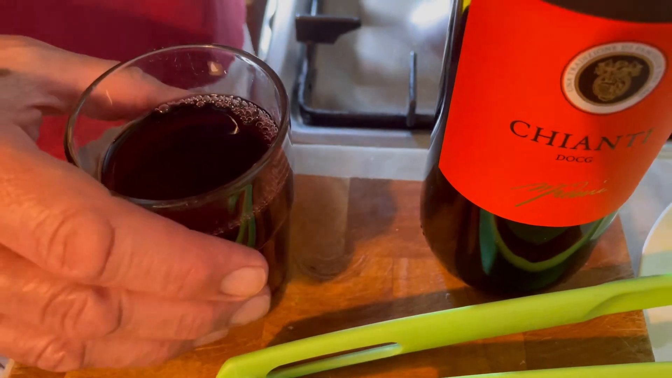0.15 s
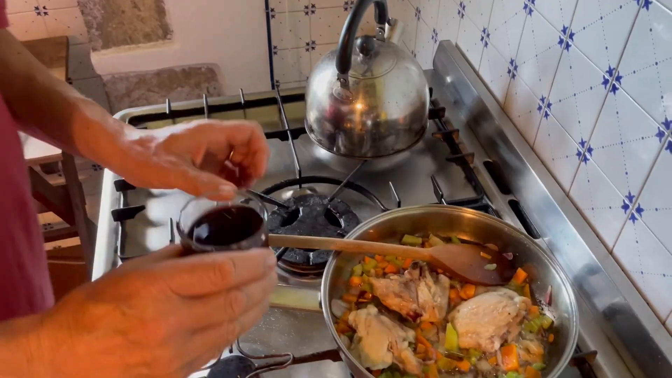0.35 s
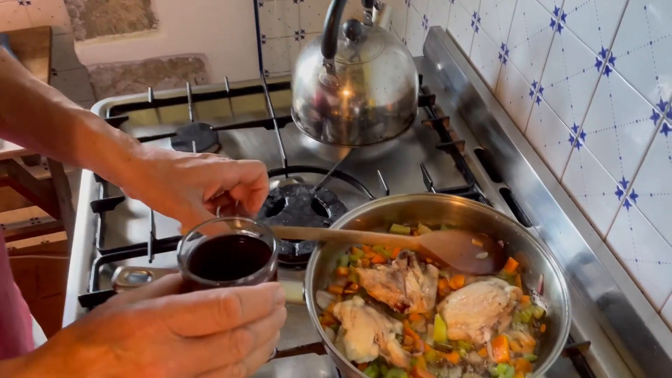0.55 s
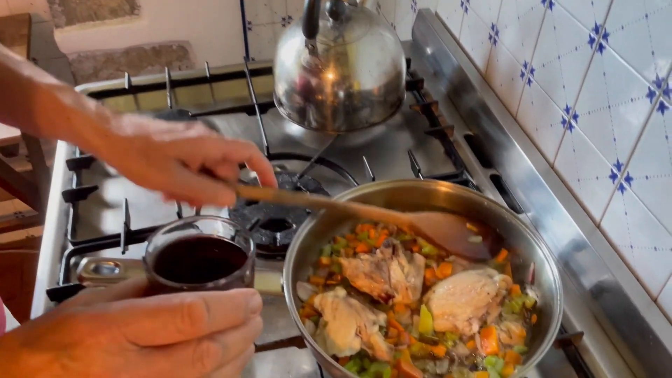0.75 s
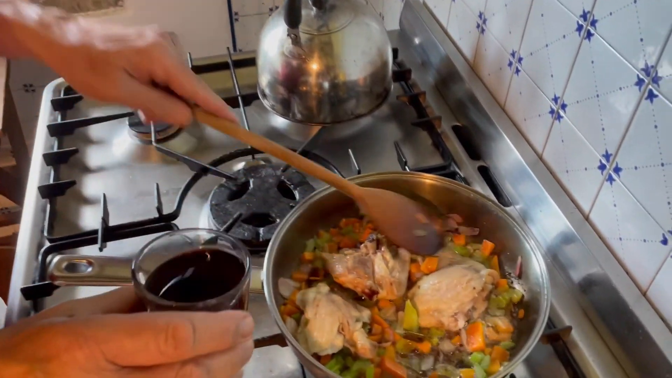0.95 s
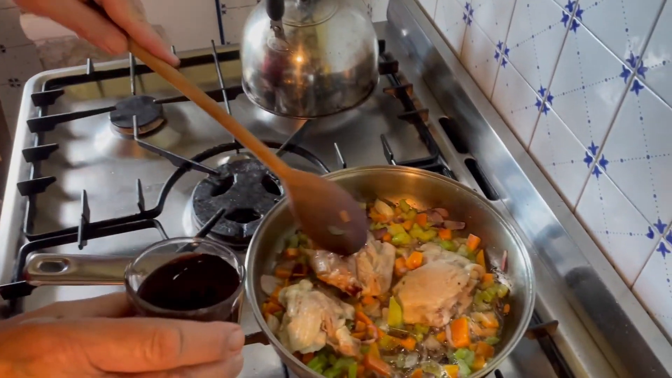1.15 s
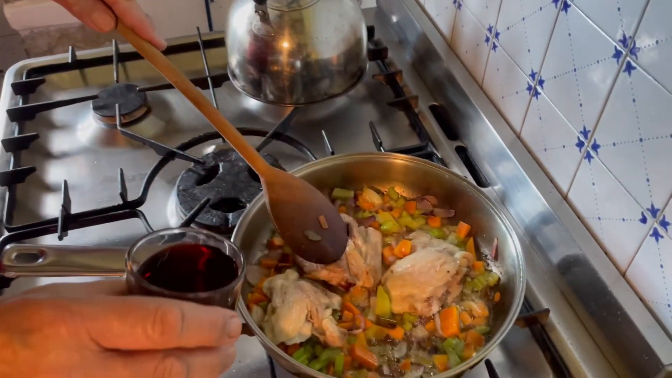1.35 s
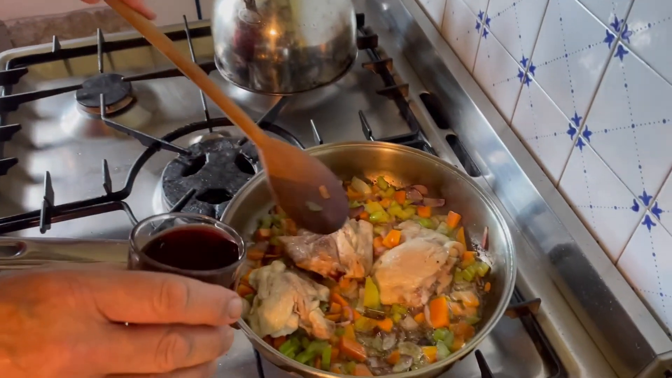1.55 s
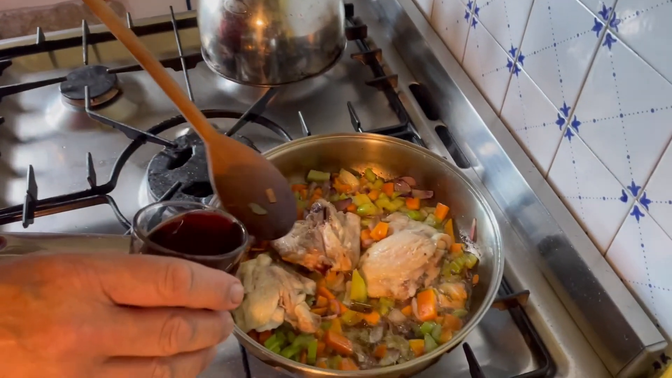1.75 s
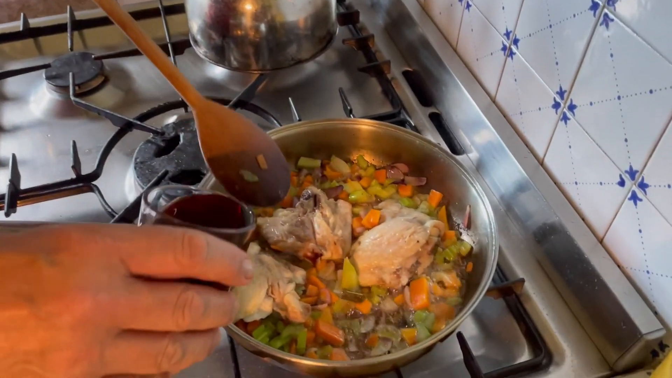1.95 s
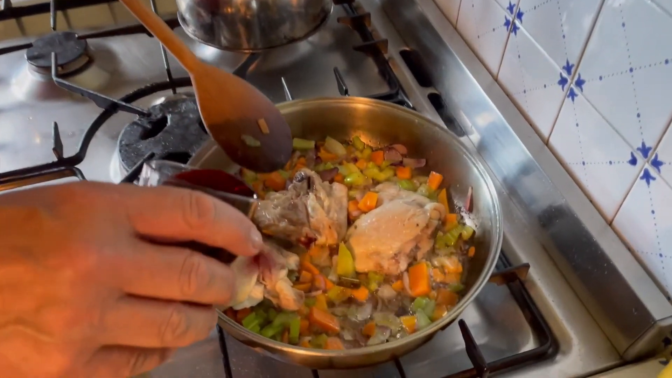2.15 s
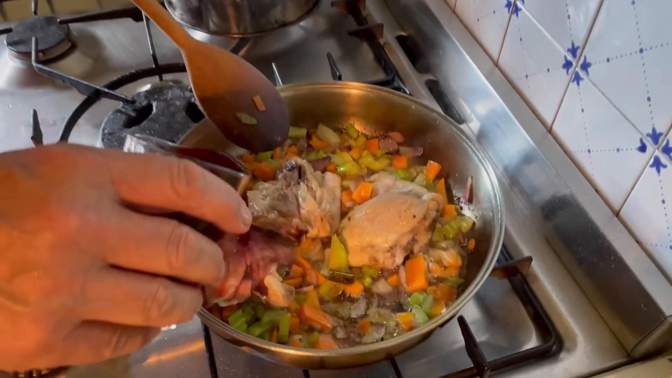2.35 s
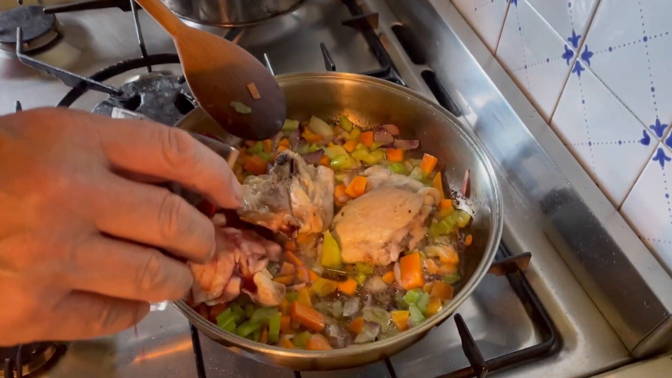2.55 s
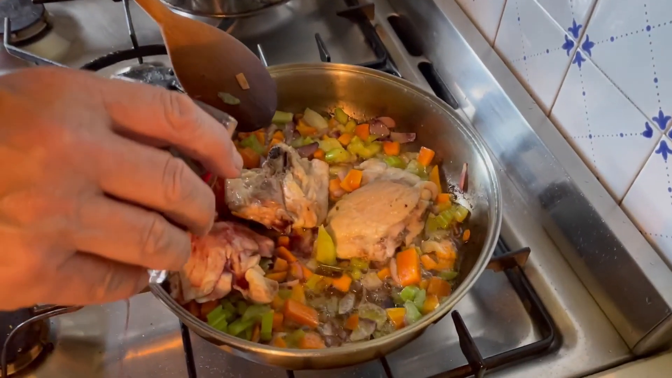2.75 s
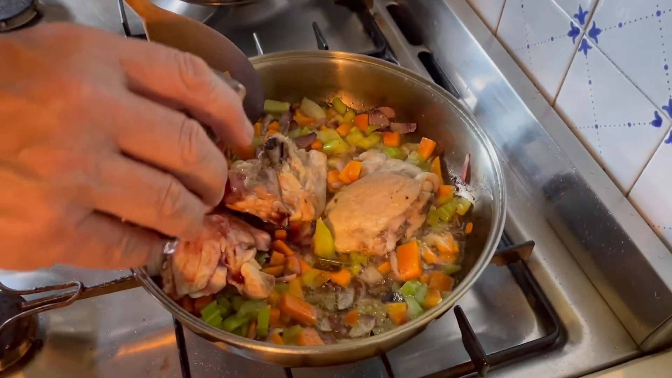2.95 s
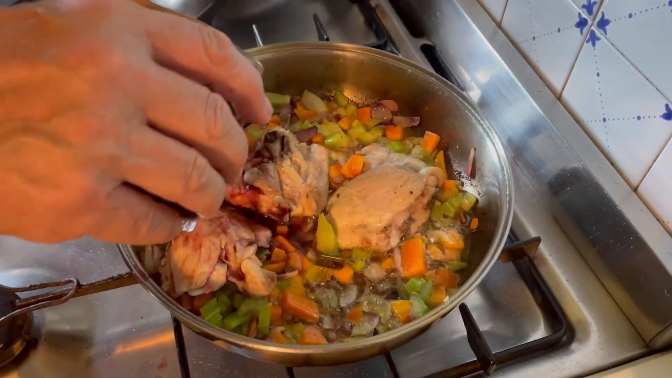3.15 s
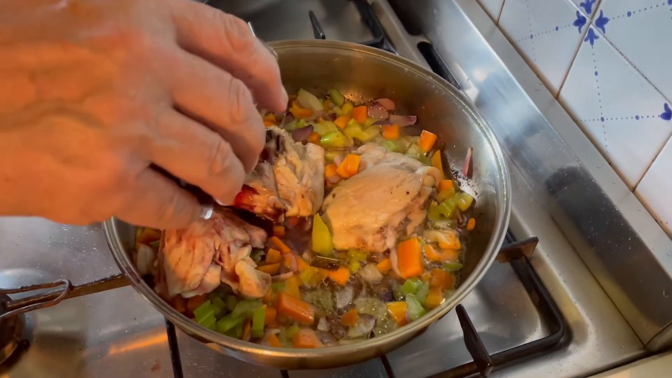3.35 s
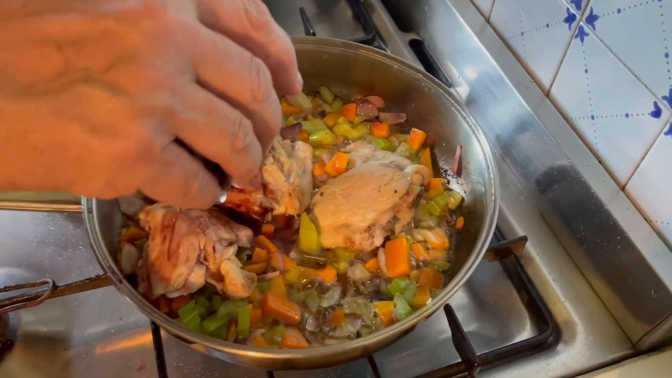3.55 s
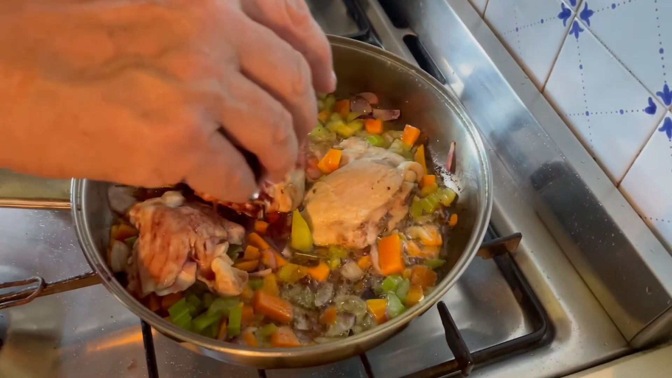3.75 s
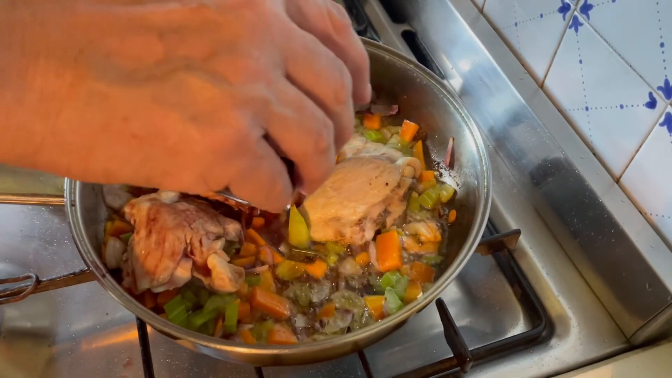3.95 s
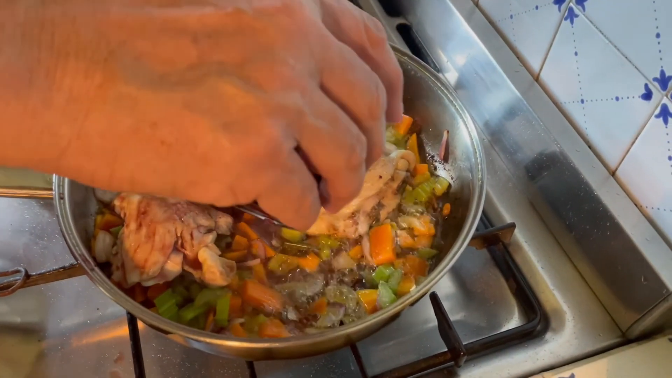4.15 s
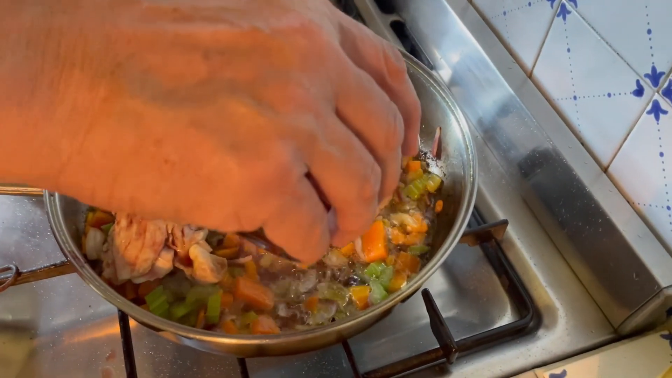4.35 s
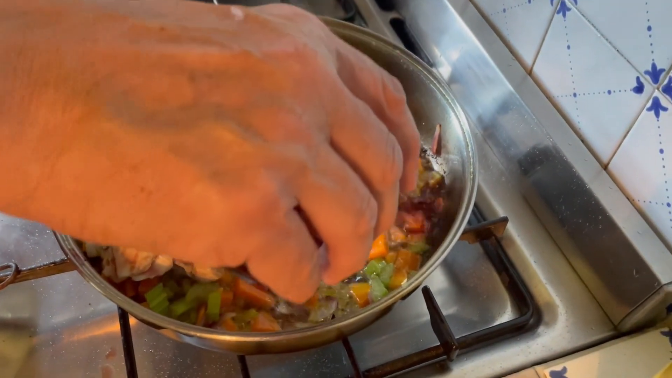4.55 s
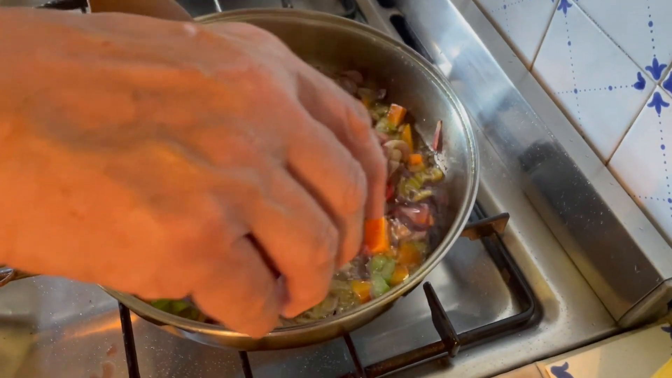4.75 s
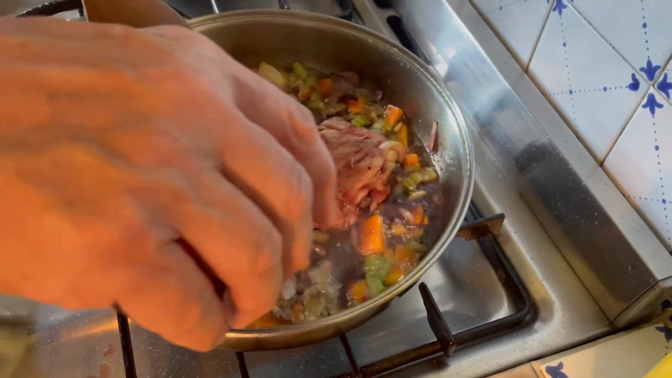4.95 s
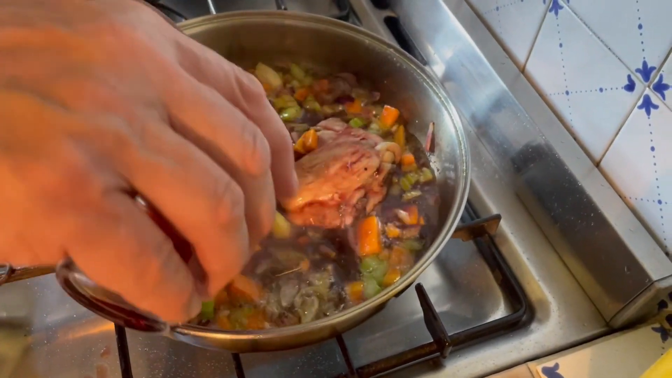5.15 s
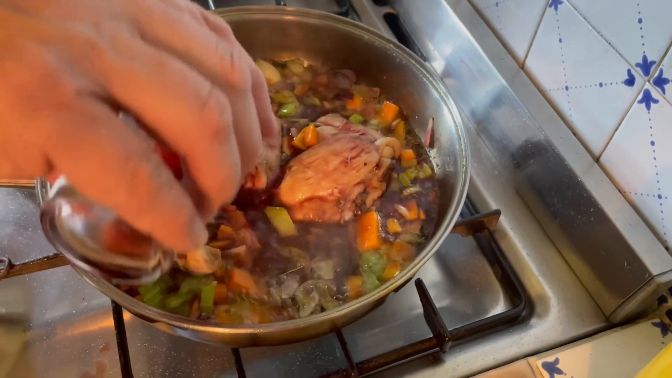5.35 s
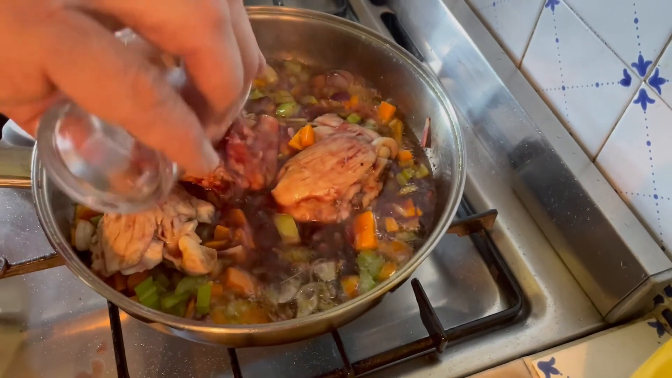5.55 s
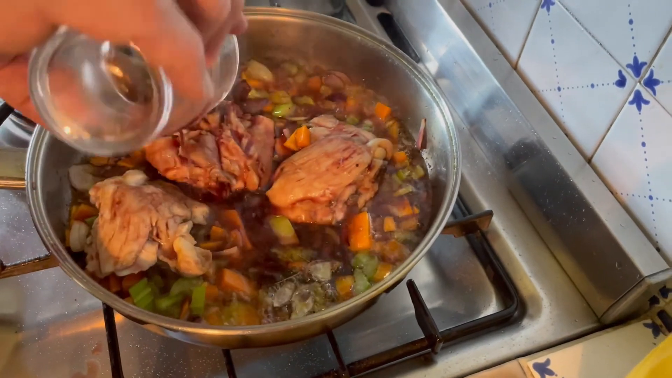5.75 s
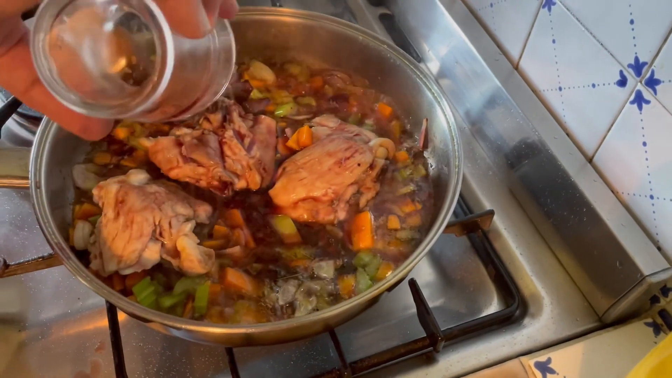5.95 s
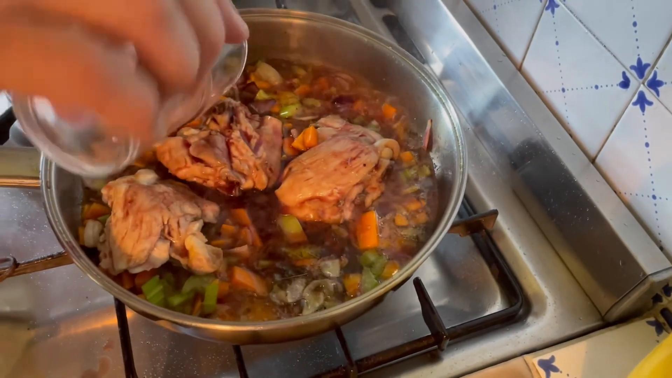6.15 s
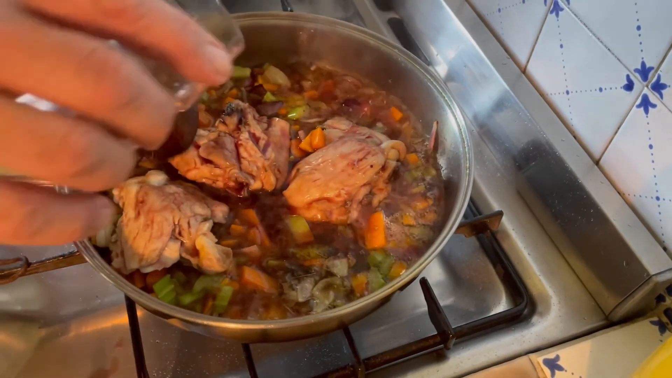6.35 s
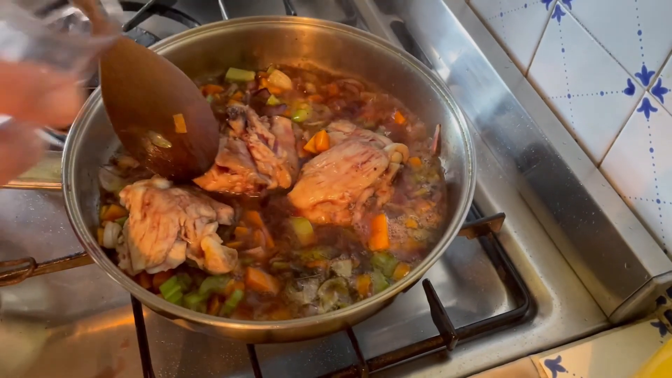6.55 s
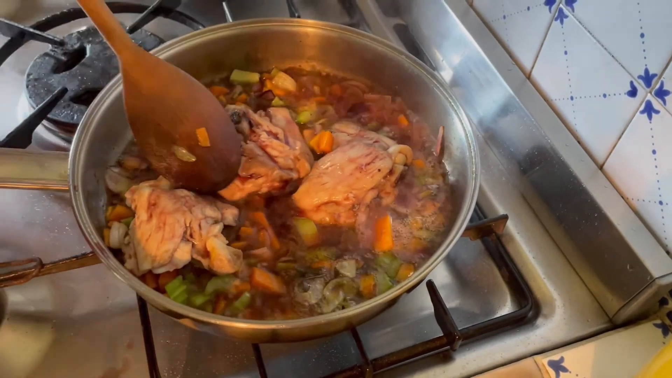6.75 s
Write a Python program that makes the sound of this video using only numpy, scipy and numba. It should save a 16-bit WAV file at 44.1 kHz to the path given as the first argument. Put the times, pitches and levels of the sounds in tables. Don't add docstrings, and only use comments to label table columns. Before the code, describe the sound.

Fat crackles and pops in a pan over a low burner rumble, then poured wine hisses, squeals and boils into a loud, gurgling sizzle.

```python
import sys
import numpy as np
from scipy import signal
from scipy.fft import rfft, irfft
from scipy.io import wavfile
from scipy.ndimage import uniform_filter1d
from numba import njit

SR = 44100
rng = np.random.default_rng(int(sys.argv[2]) if len(sys.argv) > 2 else 0)


def voltage_ratio(level):
    return 10 ** (np.asarray(level, float) / 20)


def to_wav(s):
    ch = np.atleast_2d(s).T
    pcm = np.round(np.clip(ch, -1, 1) * 32767)
    wavfile.write(sys.argv[1], SR, pcm.astype(np.int16))


N = 299880
T = np.arange(N) / SR
HZ = np.arange(N // 2 + 1) * SR / N + 1

# t/s, boil vigour/dB, steam flashing off bare steel/dB, small-bubble crackle/dB
PAN = [(0, -40, -45, -40), (.35, -37, -43.5, -33), (.8, -38.5, -40.5, -34), (1.51, -35.5, -41.5, -32),
       (1.57, -39.5, -43, -37), (2.8, -38.5, -40, -37), (2.92, -35.5, -40.5, -30),
       (3.35, -25.5, -38, -26.5), (3.9, -23.5, -36, -27), (4.1, -22.5, -34.5, -25), (4.56, -22, -33, -26),
       (4.61, -21, -26, -22), (4.95, -22.5, -28, -20), (5.1, -21.5, -29, -19.5), (5.35, -21.5, -27.5, -18),
       (5.6, -21.5, -25.5, -16.5), (5.85, -20.5, -21, -17), (6.2, -23.5, -21, -16.5),
       (6.22, -24, -25.5, -17.5), (6.8, -26, -23.5, -22.5)]
CALM_DB = -40, -43, -34
FOLLOWS = {"gurgle": (-46, 0.2629, 0.01, 0.2536), "boil": (-36, 1.0632, -0.0071, -0.0469),
           "fat": (-33.5, -0.0426, 0.03, 0.8746), "steam": (-43.5, 0.0625, 0.9948, 0.1025),
           "jet": (-43, .5, 0.3548, 0.062), "flame": (-41, 0.13, 0.1329, -0.0745)}

# f/Hz, level per Hz/dB
GURGLE = [(140, -5.5), (220, -3.5), (330, 1.5), (420, -2), (600, 1.5), (730, 3.5), (900, 3.5), (1300, -49)]
BOIL = [(600, -28), (950, -4.5), (1150, -2.5), (1300, 1), (1600, 1.5), (1900, 1.5), (2300, -6.5),
        (3500, -47)]
SEETHE = [(1200, -32), (1750, -3.5), (2100, 8), (2500, 7.5), (2750, -8), (3300, -11), (5000, -38)]
FAT = [(1200, -45), (2000, -6), (2600, 3), (3100, 2), (3900, 1), (4600, 0), (5500, -2), (8000, -51)]
STEAM = [(4000, -30), (5800, -7), (6900, 0), (8000, -2), (9500, -4.5), (10800, -8), (13000, -8.5),
         (15600, -9)]
RUMBLE = [(50, -59), (66, -13), (85, -2), (105, -6.5), (131, 0.5), (155, -12), (230, -13), (300, -32)]
HAND = [(20, -50), (32, -34), (38, 11.5), (48, 9), (62, 8), (85, -31)]

# t/s, level/dB
SEETHE_LEVEL = [(1.5, -18), (2.8, -9.5), (4.3, -11), (4.55, -11), (4.88, -6), (4.96, -1), (5.3, 0.5),
                (5.45, -1.5), (5.9, -4.5), (6.2, -1), (6.23, -3), (6.8, -3.5)]
# t/s, share held back [0-1]
SHALLOW = [
    (2.9, 0.29),
    (3.5, 0.48),
    (3.93, 0.29),
    (3.98, .02),
    (4.3, .02),
    (4.4, 0.3),
    (4.85, 0.21),
    (4.95, 0.022),
]
SHALLOW_HZ = 1720
DEEP_FROM_S, DEEP_FULL_S, DEEP_HZ, DEEP_SHARE = 4.55, 5.9, 777, 0.55
DEPTH_DB, DEPTH_S = 12.5, 1.75
OPENING_DB, OPENING_S = 3, 0.52
DREGS_S, DREGS_HALF_S, DREGS_DB = 5.9, 0.15, 1.5

# f/Hz, width/Hz, level/dB
STEEL = [(236.4, 32, 5.5), (330, 17, -5.5), (395, 31.5, 10.5), (490, 56, -4), (728.5, 30, 11),
         (859, 14, -15), (1052, 53, -43), (1151, 10.5, -11), (1270, 32, -24), (1360, 16, -29),
         (1720, 16, -43), (2180, 37, -46), (2710, 59, -5)]
DRY_RING = .55

# t/s, peak/dB, f/Hz
POPS = [(0.1391, -14, 3080), (0.2095, -8.5, 2800), (0.2813, -17, 2430), (0.3512, -9.5, 2870),
        (0.394, -13, 3000), (0.5736, -9, 2670), (0.6424, -10, 4000), (0.657, -13, 2800), (0.7143, -8, 2760),
        (0.792, -14, 3080), (0.8252, -12, 2600), (0.842, -10, 3970), (0.9245, -15, 3060),
        (1.024, -13, 4200), (1.044, -13, 4230), (1.0559, -6, 2900), (1.1777, -13.5, 2770),
        (1.2042, -18, 2830), (1.5193, -13, 2700), (1.6675, -20, 4110), (1.78, -15, 2880),
        (2.044, -11.5, 2210), (2.176, -14, 3120), (2.1957, -5.5, 2930), (2.2593, -7.5, 3150),
        (2.272, -13, 3080), (2.3757, -18, 2400), (2.4567, -14, 4700), (2.599, -10, 4050),
        (2.6688, -18, 3000)]
# t/s, peak/dB, f/Hz
PLOPS = [(2.729, -19, 1180), (2.8693, -9, 4900), (2.887, -8.5, 3180), (2.908, -18, 5000),
         (3.039, -20, 4790), (3.072, -18, 2180), (3.26, -15, 1260), (3.746, -11, 1270), (4.071, -8, 1320),
         (4.1846, -16, 1270), (4.222, -15, 1200)]
# t/s, peak/dB, f/Hz
LESSER = [(0.0178, -14, 3050), (0.0376, -13, 3150), (0.0616, -10, 3700), (0.2344, -16, 2540),
          (0.3854, -12, 2610), (0.4213, -16, 1720), (0.487, -16, 1720), (0.5427, -10, 2850),
          (0.7521, -13, 3040), (0.9826, -14, 1920), (1.1457, -15, 2750), (1.2444, -17, 3100),
          (1.2779, -21, 2710), (1.35, -16, 2740), (1.4185, -11, 2540), (1.5777, -22, 2900),
          (1.684, -17, 3160), (1.747, -12, 2880), (1.922, -17, 2930), (1.9763, -14, 3360),
          (2.0042, -17, 3100), (2.1439, -18, 3830), (2.2444, -13, 3100), (2.287, -16, 1320),
          (2.339, -17, 2040), (2.4936, -27, 1300), (2.5221, -18, 2330), (2.5675, -19, 3010),
          (2.8359, -28, 5070), (2.9295, -15, 1500), (2.9774, -12, 3560), (3.0164, -19, 4830),
          (3.098, -13, 1900), (3.1528, -2, 5940), (3.1684, -16, 1520), (3.1892, -10, 1600),
          (3.2221, -19, 1260), (3.3044, -7, 3460), (3.6794, -10, 1920), (3.7244, -25, 1080),
          (3.7514, -10, 1260), (4.4037, -12, 2180)]
# t/s, peak/dB, f/Hz
TICKS = [(0.0477, -27, 3060), (0.0685, -24, 2150), (0.4282, -24, 1460), (0.4618, -19, 2950),
         (0.5743, -20, 2630), (0.5798, -32, 1460), (0.6428, -22, 1770), (0.6513, -21, 3100),
         (0.7238, -19, 3270), (0.7725, -17, 2840), (0.7852, -23, 1370), (0.796, -21, 1870),
         (0.9198, -25, 2800), (1.045, -23, 3960), (1.2131, -22, 2750), (1.2227, -24, 2040),
         (1.2465, -21, 3060), (1.293, -20, 2840), (1.304, -20, 2800), (1.3521, -22, 1980),
         (1.3557, -22, 3320), (1.3639, -21, 2800), (1.5198, -25, 2200), (1.5282, -24, 2840),
         (1.5372, -20, 2730), (1.5935, -17, 2980), (1.6682, -22, 3960), (1.7737, -21, 3060),
         (1.775, -27, 1290), (1.9304, -24, 2890), (1.9399, -23, 3270), (1.9542, -22, 3190),
         (1.9793, -20, 3360), (2.0051, -26, 1810), (2.0497, -26, 1460), (2.059, -17, 2970),
         (2.0695, -22, 1770), (2.1872, -20, 3190), (2.1947, -18, 2060), (2.2451, -23, 1640),
         (2.414, -20, 3450), (2.4949, -25, 1550), (2.5009, -27, 4060), (2.5234, -22, 2440),
         (2.5396, -24, 3190), (2.5922, -15, 3360), (2.6727, -17.5, 3060), (2.856, -24, 1380),
         (2.916, -14, 3830), (2.9326, -21, 1850), (2.9889, -19, 2800), (3.318, -13, 2240),
         (3.7224, -15, 3400), (3.7524, -15, 2710), (4.1977, -6.5, 3530), (5.384, -5, 1720),
         (6.0335, -13, 2240), (6.1886, -4, 1950), (6.6529, -14, 2410), (6.7292, -9, 2630)]
# t/s, peak/dB, f/Hz
PRICKS = [(0.0419, -27, 4260), (0.1406, -28, 4520), (0.1862, -27, 4520), (0.3153, -23, 9470),
          (0.3154, -24, 5810), (0.5073, -27, 5940), (0.5587, -24, 5080), (0.5797, -19, 9430),
          (0.719, -27, 10470), (0.795, -19, 4690), (0.8019, -24, 4740), (0.8978, -31, 9650),
          (0.9254, -23, 4950), (1.045, -24, 9170), (1.0691, -22, 6120), (1.2017, -33, 4910),
          (1.2197, -24, 5810), (1.3522, -22, 8530), (1.4635, -28, 11280), (1.5647, -32, 4310),
          (1.5793, -24, 4870), (1.581, -23, 11280), (1.6853, -31, 4690), (1.7759, -29, 8310),
          (1.8018, -28, 9220), (1.8231, -29, 5210), (1.8562, -26, 12490), (2.0602, -21, 5300),
          (2.1614, -26, 10770), (2.1657, -23, 9300), (2.2212, -24, 4050), (2.3047, -28, 5600),
          (2.3697, -20, 5990), (2.4108, -27, 4870), (2.5085, -25, 4050), (2.6699, -23, 5340),
          (2.7407, -25, 4820), (2.764, -22, 4950), (2.7896, -20, 6030), (2.8918, -26, 10030),
          (2.9748, -27, 10030), (3.0743, -21, 4610), (3.169, -16, 4740), (3.2235, -18, 4350),
          (3.4674, -23, 11460), (3.6411, -19, 9040), (3.7528, -15, 4610), (3.832, -18, 9350),
          (4.3893, -21, 9000), (4.4789, -22, 9220), (4.5392, -12, 5940), (5.0688, -19, 10770),
          (5.076, -18, 9170), (5.2253, -10, 5510), (5.2629, -9, 5810), (5.5555, -2, 9820),
          (5.704, -1, 11670), (5.8923, -6, 9600), (5.9277, -8, 5640), (6.3549, -3, 9910)]
# t/s, peak/dB, f/Hz, body/dB
SPITS = [(0.2094, -18, 1990, 5), (0.3817, -9.5, 7400, -8), (0.577, -10, 6700, -6), (0.643, -9, 9200, -6),
         (0.844, -12, 7300, 2), (1.0253, -11, 8800, -10), (1.219, -16, 7100, 1), (1.6365, -11, 8600, -6),
         (1.6665, -12, 8200, -10), (1.7598, -4.5, 9800, -2.5), (1.8502, -13, 10700, -12),
         (2.1548, -1.5, 8900, -10), (2.376, -13, 6480, 10), (2.5988, -4, 7400, 0.5),
         (2.689, -4.5, 10200, -15), (2.9085, -10, 6500, 0), (2.9268, -10, 11800, -6),
         (3.0163, -13, 7000, -3), (3.61, -14, 12500, -12), (3.682, -3, 8600, -6), (3.777, 2, 8850, -4),
         (3.8032, -3, 8400, -10), (3.974, -3, 7800, -10), (4.1886, -0.5, 7900, -2), (4.2235, -2, 8200, 2),
         (4.272, -4, 8000, -8), (4.4056, -1, 8000, 2), (5.054, 9, 8700, -11), (5.1937, 3, 7700, -2),
         (5.2091, 3, 10600, -11), (5.463, -5, 7800, -7), (5.5355, 7, 8200, -2), (6.5739, 4, 7600, -11)]
LESSER_DB, LESSER_CYCLES = -7.5, 3.4
TICK_DB, PRICK_DB, TICK_CYCLES = -2, 3, 3.9
AFTER_POPS, AFTER_S, AFTER_DB = 3, 0.0048, -13
SMALL_POPS, SMALL_UNTIL_S = 12, 2.9
SMALL_DB, SMALL_SCATTER_DB, SMALL_HZ, SMALL_OCTAVES = -23, 2.5, 2900, .3
SIDELONG_DB = -15

# t/s, level/dB
SWAY = [
    (.4, -48),
    (.85, -42),
    (1.17, -47),
    (2.0, -50),
    (2.97, -53),
    (3.1, -52),
    (4.03, -48),
    (6.75, -52),
]
SWAY_DB, SWAY_FADE_DB_S, SWAY_S = -40.5, -3.5, 0.047
SWAY_HZ, SWAY_TONE_DB = 46.5, 1.5
# f/Hz, level/dB
BOOMS = [(132, -5), (84, -11), (47, -15)]
BOOM_WAVER = .025
PUFF_S, PUFF_HALF_S, PUFF_DB = 3.8, 0.33, 4.5

# t/s, level/dB
VENT = [(2.55, -2.5), (2.7, 5), (3.3, 0), (3.5, 0), (4.05, 2), (4.55, -1.5), (4.65, 3.5), (5.04, 1),
        (5.3, 3.5), (5.6, 2.5), (5.78, 3), (5.85, -1), (5.95, 1), (6.2, -1), (6.23, 0), (6.8, -5)]
JET_HZ, LANDS_S = 5756, 2.99
JET_RISE_HZ, JET_SETTLES_S = 320, (3.3, 3.6)
LANDING_DB, LANDING_RISE_S, LANDING_FALL_S = 4, 0.099, 0.39
# t/s, half length/s, f/Hz, width/Hz, level/dB
SQUEALS = [
    (2.76, .04, 4830, 400, -36.5),
    (2.89, .045, 4950, 400, -31),
    (2.97, .14, 4880, 300, -31.5),
    (3.07, .03, 4800, 400, -35),
    (3.3, .045, 3450, 280, -31),
    (3.74, .07, 2950, 300, -30),
    (3.86, .06, 2800, 300, -27.5),
    (5.55, .2, 3650, 350, -31),
    (5.85, .35, 11400, 600, -31),
]

# f/Hz, lead of the left/rad
LEAD = [(0, 0), (500, 0), (750, .6), (1200, .1), (2000, -.1), (3200, .9), (4000, .2), (5600, 0),
        (6200, -1.6), (6600, -2.6), (6900, -3.06), (7450, -3.2)]
# f/Hz, left minus right/dB
TILT = [(60, 0), (250, 0), (380, -2), (700, 4), (1290, 3), (2200, 1.5), (3300, 3), (4700, 2), (6200, 4),
        (6800, 0), (15000, 0)]
# f/Hz, likeness [0-1]
ALIKE = [(60, .99), (300, .96), (650, .7), (850, .5), (1300, .76), (2150, .9), (3200, .75), (4700, .94),
         (6100, .5), (6800, .99), (7500, .99), (9000, .92), (13600, .995), (15000, .997)]
LAG_SAMPLES, CANCEL_HZ = 6.2, 7390
TOP_SLIP, SLIP_HZ = .3, 15100
SHIFT_SAMPLES, SHIFT_RATE, SHIFT_TOP_HZ = .14, 16, 10000
STILL_S, STILL_SHARE = (5.6, 5.8), .5
TOP_HZ = 15800


def noise():
    return rng.standard_normal(N)


def curve(points):
    return np.interp(T, *np.transpose(points))


def across(points):
    hz, value = np.transpose(points)
    return np.interp(np.log(HZ), np.log(hz + 1), value)


def hump(centre_s, half_s):
    return np.exp(-((T - centre_s) / half_s) ** 2)


def colour(x, points):
    y = irfft(rfft(x) * voltage_ratio(across(points)), N)
    return y / np.sqrt(np.mean(y ** 2))


def walk(rate):
    hold = int(SR / rate)
    steps = noise()[np.arange(N) // hold]
    return uniform_filter1d(steps, hold) * np.sqrt(1.5)


def wavering_tone(hz, waver, rate):
    return np.sin(2 * np.pi * np.cumsum(hz * (1 + waver * walk(rate))) / SR)


@njit
def resonance(x, hz, width):
    y, band, low = np.empty(len(x)), 0., 0.
    for i in range(len(x)):
        g, damping = np.tan(np.pi * hz[i] / SR), width / hz[i]
        v = (band + g * (x[i] - low)) / (1 + g * (g + damping))
        band, low, y[i] = 2 * v - band, low + 2 * g * v, damping * v
    return y


@njit
def blips(s, hz, cycles, size, glide):
    out = np.zeros(N)
    for k in range(len(s)):
        tau, start = cycles[k] * SR / hz[k] / 4, s[k] * SR
        for i in range(max(int(start) + 1, 0), min(int(start + 9 * tau), N)):
            u = (i - start) / tau
            phase = 2 * np.pi * hz[k] * (i - start) / SR * (1 + glide * u / 8)
            out[i] += size[k] * u * u * np.exp(2 - u * 2 ** .5 * 1.2) * np.sin(phase)
    return out


def layer_db(name):
    s, *controls = np.transpose(PAN)
    calm_db, *shares = FOLLOWS[name]
    rise = sum(k * (c - calm) for k, c, calm in zip(shares, controls, CALM_DB))
    return np.interp(T, s, calm_db + rise)


def landing_db():
    since = T - LANDS_S
    return LANDING_DB * np.exp(np.where(since < 0, since / LANDING_RISE_S, -since / LANDING_FALL_S))


def froth(points, lo_hz, hi_hz, count, cycles, spread_db, bed, surge_db, surge_rate, glide=0.16):
    when, pitch, big, sign = rng.random((count, 4)).T
    hz = lo_hz * (hi_hz / lo_hz) ** pitch
    size = hz * voltage_ratio(-spread_db * np.log(big + 1 / 120)) * np.sign(sign - .5)
    swarm = blips(when * N / SR, hz, cycles + 0 * hz, size, glide)
    hiss = colour(noise(), points)
    surge = voltage_ratio(surge_db * walk(surge_rate))
    bed = np.clip(bed, 0, 1)
    return surge * (np.sqrt(1 - bed) * colour(swarm, points) + np.sqrt(bed) * hiss)


def ring(x, strength=1.75):
    lift = sum(strength / (1 + 1j * (HZ - hz) / (width / 2)) * voltage_ratio(db / 3) for hz, width, db in STEEL)
    filled = np.interp(T, [LANDS_S - .1, LANDS_S + .1], [DRY_RING, 1])
    return x + filled * irfft(rfft(x) * lift, N)


def sizzle(gurgle_db, boil_db, fat_db, steam_db):
    wet = np.interp(T, [2.7, 4.2], [0, 1])
    flare = walk(30) * (1 - .45 * wet)

    gurgle = froth(GURGLE, 188.7, 1098.0, count=4000, cycles=12.9, spread_db=1.5, bed=0.75,
                   surge_db=-1.5, surge_rate=8.8)
    muffled = np.interp(T, [DEEP_FROM_S, DEEP_FULL_S], [0, DEEP_SHARE])
    gurgle = gurgle - muffled * resonance(gurgle, DEEP_HZ + 0 * T, 310.0)

    boil = froth(BOIL, 800., 2600., count=9000, cycles=4., spread_db=2.4, bed=.6,
                 surge_db=.4, surge_rate=30)
    seethe = froth(SEETHE, 1500., 3600., count=9000, cycles=4., spread_db=2.6, bed=.55 + .05 * wet,
                   surge_db=.5, surge_rate=30)
    boil = boil - curve(SHALLOW) * resonance(boil, SHALLOW_HZ + 0 * T, 810.0)
    boil = voltage_ratio(-3.0) * boil + voltage_ratio(curve(SEETHE_LEVEL) - 4.5) * seethe

    fat = froth(FAT, 1600., 6500., count=9000, cycles=4.5, spread_db=2.4, bed=.4 + .4 * wet,
                surge_db=1.2 - .8 * wet, surge_rate=24)
    steam = froth(STEAM, 4500., 17000., count=40000, cycles=2., spread_db=3.3, bed=.55,
                  surge_db=1.3 - .5 * wet, surge_rate=36)

    liquid = ring(voltage_ratio(gurgle_db - 4.5) * gurgle + voltage_ratio(boil_db + 0.71 * flare) * boil)
    crackle = voltage_ratio(fat_db + 0.16 * flare) * fat
    return liquid + crackle + voltage_ratio(steam_db + 7.5 + 0.14 * flare) * steam


def kitchen(rumble_db):
    sway = voltage_ratio(SWAY_DB + SWAY_FADE_DB_S * T) + sum(voltage_ratio(db) * hump(s, SWAY_S) for s, db in SWAY)
    boom = sum(voltage_ratio(db + 2 * walk(9.9)) * wavering_tone(hz, BOOM_WAVER, 14) for hz, db in BOOMS)
    flame_db = rumble_db + 1.1 * walk(8.1) + PUFF_DB * hump(PUFF_S, PUFF_HALF_S)
    flame = (colour(noise(), RUMBLE) + boom) * voltage_ratio(flame_db)
    tremor = voltage_ratio(SWAY_TONE_DB + 1.5 * walk(6.1)) * wavering_tone(SWAY_HZ, 0.038, 13)
    thud = blips(np.array([.822]), np.array([50.]), np.array([4.]), voltage_ratio([-27.]), 0.)
    return flame + thud + (0.88 * colour(noise(), HAND) + tremor) * sway


def bubbles():
    large = np.transpose(POPS + PLOPS)
    s, db, hz = np.repeat(large, AFTER_POPS, axis=1)
    wait, chance = rng.exponential(size=s.shape), rng.standard_normal((len(s), 2)).T
    after = [s + 0.00202 + AFTER_S * wait, db + AFTER_DB + 3 * chance[0], hz * 2 ** (0.051 * chance[1])]
    chance = rng.standard_normal((SMALL_POPS, 2)).T
    small = [rng.random(SMALL_POPS) * SMALL_UNTIL_S,
             SMALL_DB + SMALL_SCATTER_DB * chance[0],
             SMALL_HZ * 2 ** (SMALL_OCTAVES * chance[1])]
    return np.hstack([large, after, small])


def spatter(echo_s=0.0014, echo_db=-9):
    s, db, hz = bubbles()
    pops = blips(s + 0.000524, hz, 5 + 0 * s, voltage_ratio(db - 6), 0.05)
    for table, lift_db, cycles, glide in ((LESSER, LESSER_DB, LESSER_CYCLES, 0.05),
                                          (TICKS, TICK_DB, TICK_CYCLES, 0.032),
                                          (PRICKS, PRICK_DB, TICK_CYCLES, 0.032)):
        s, db, hz = np.transpose(table)
        pops = pops + blips(s, 1. * hz, cycles + 0 * s, voltage_ratio(db + lift_db), glide)
    s, db, hz, body_db = np.transpose(SPITS)
    crack = blips(s, 1. * hz, 2. + 0 * s, voltage_ratio(db - 2.), 0.)
    body = blips(s, 2570.0 + 0 * s, 2.0 + 0 * s, voltage_ratio(db + body_db - 9), 0.)
    spray = rng.standard_normal(300) * np.exp(-np.arange(300) / SR / .0015) * voltage_ratio(-22)
    burst = pops + body + crack + np.convolve(crack, spray)[:N]
    return burst + voltage_ratio(echo_db) * np.roll(burst, int(echo_s * SR))


def jets(flutter_db=0.57):
    centre_hz = JET_HZ + np.interp(T, JET_SETTLES_S, [JET_RISE_HZ, 0])
    air = resonance(noise(), centre_hz * (1 + 0.006 * walk(6)), 520.0)
    level = layer_db("jet") + landing_db() + curve(VENT) + flutter_db * walk(27)
    return air / air.std() * voltage_ratio(level)


def squeals():
    out = 0
    for s, half_s, hz, width, db in SQUEALS:
        air = resonance(noise(), hz + 0 * T, 1. * width)
        air = resonance(air, hz + 0 * T, 1. * width)
        out = out + air / air.std() * voltage_ratio(db) * hump(s, half_s)
    return out


def ports(x):
    cells = signal.stft(x, nperseg=256)[2]
    scrambled = cells * np.exp(2j * np.pi * rng.random(cells.shape))
    scattered = signal.istft(scrambled, nperseg=256)[1][:N]
    alike = np.clip(across(ALIKE), 0, .999)
    direct = rfft(x) * np.sqrt((1 + alike) / 2)
    spread = rfft(scattered * x.std() / scattered.std()) * np.sqrt((1 - alike) / 2)

    hz, lead = np.transpose(LEAD)
    lag = -np.pi - 2 * np.pi * LAG_SAMPLES / SR * (HZ - CANCEL_HZ)
    lag = np.maximum(lag, -3 * np.pi) - TOP_SLIP * np.clip((HZ - SLIP_HZ) / 200, 0, 1)
    lead = np.where(HZ > hz[-1], lag, np.interp(HZ, hz, lead))
    turn = np.exp(.5j * lead) * voltage_ratio(across(TILT) / 2)
    pair = np.array([(direct + spread) * turn, (direct - spread) / turn])

    slope = irfft(pair * 2j * np.pi * HZ / SR / (1 + (HZ / SHIFT_TOP_HZ) ** 12), N)
    slope = slope * np.array([[.5], [-.5]])
    wander = SHIFT_SAMPLES * np.interp(T, STILL_S, [1.15, STILL_SHARE]) * walk(SHIFT_RATE)
    return irfft(pair, N) + wander * slope


def scene():
    depth_db = DEPTH_DB * (1 - np.exp(-np.maximum(T - LANDS_S, 0) / DEPTH_S))
    depth_db = depth_db + OPENING_DB * np.exp(-T / OPENING_S) + DREGS_DB * hump(DREGS_S, DREGS_HALF_S)
    gurgle_db = layer_db("gurgle") + depth_db + 0.34 * landing_db()
    pan = sizzle(gurgle_db, layer_db("boil"), layer_db("fat"), layer_db("steam"))
    spits = spatter()
    edge = voltage_ratio(SIDELONG_DB) * np.diff(spits, prepend=0)
    return ports(pan + jets() + squeals() + spits + kitchen(layer_db("flame"))) + edge


def roll_off(x):
    return signal.sosfilt(signal.butter(12, 15670, fs=SR, output="sos"), x)


def record(dry):
    bass_cut = signal.sosfilt(signal.butter(6, 39, "high", fs=SR, output="sos"), dry)
    top_cut = signal.sosfilt(signal.ellip(8, .2, 70, TOP_HZ, fs=SR, output="sos"), bass_cut)
    mix = np.clip(top_cut, -1, 1)
    return roll_off(mix)


dry = scene()
out = record(dry)
to_wav(out)
```